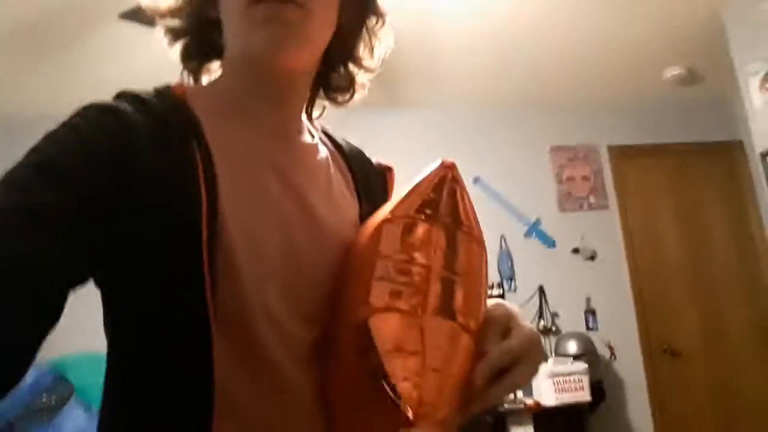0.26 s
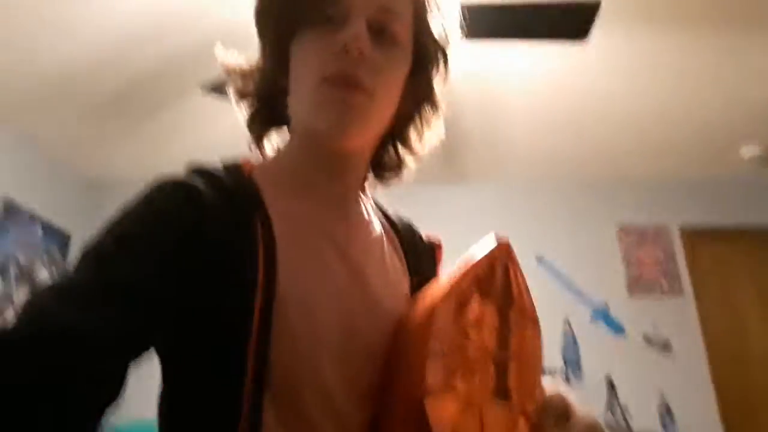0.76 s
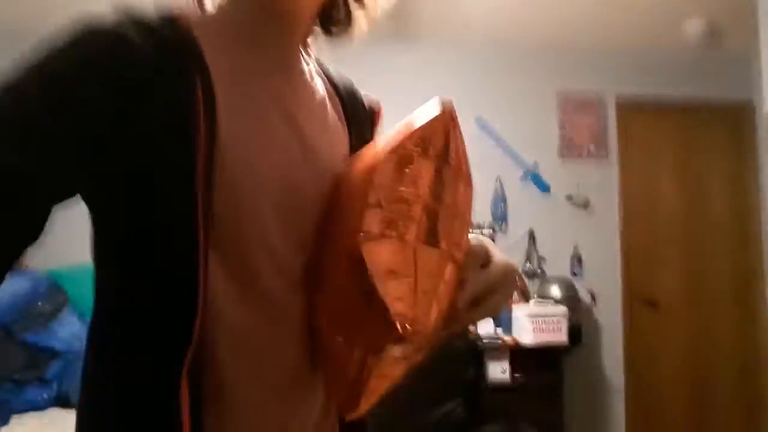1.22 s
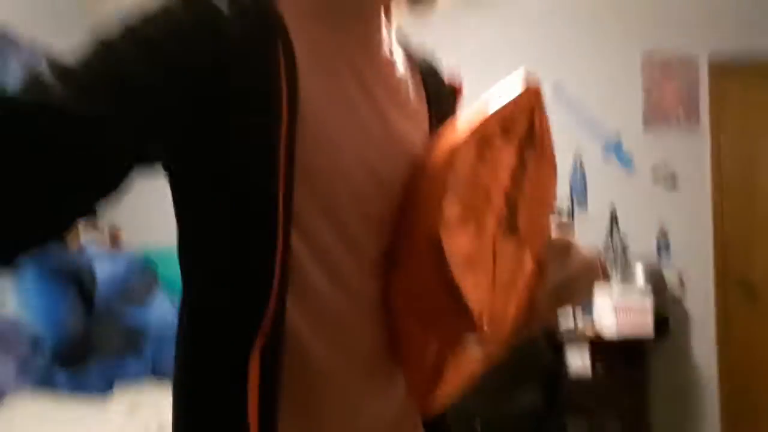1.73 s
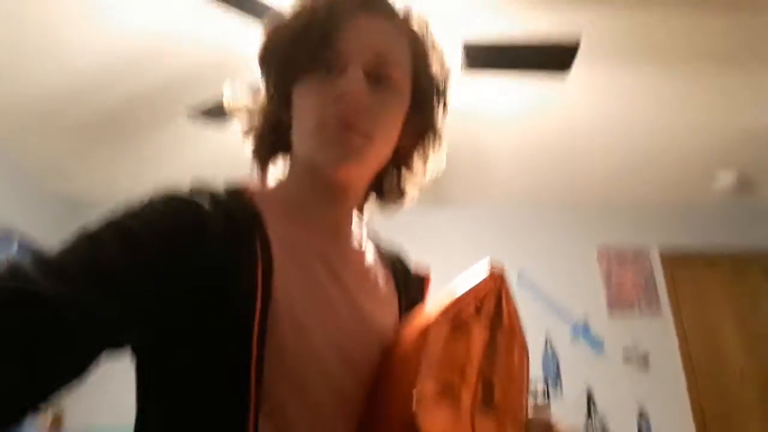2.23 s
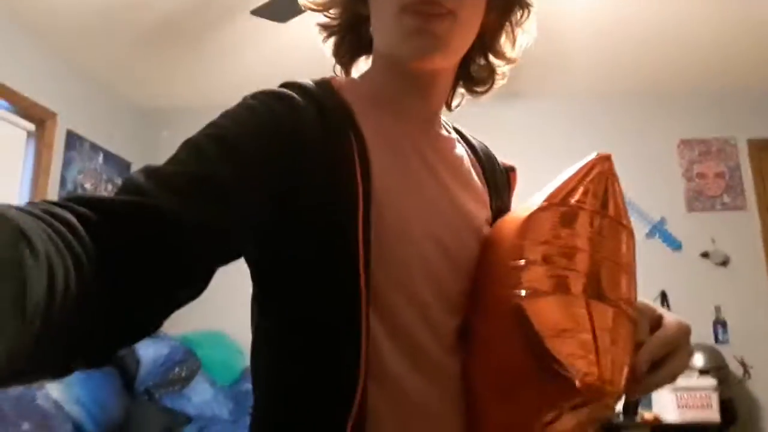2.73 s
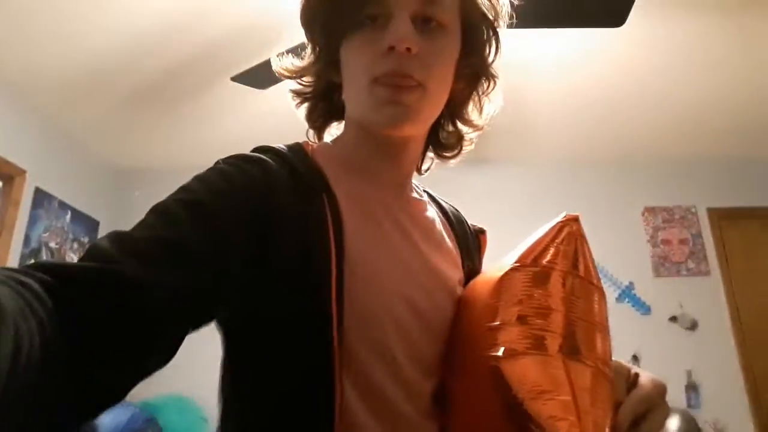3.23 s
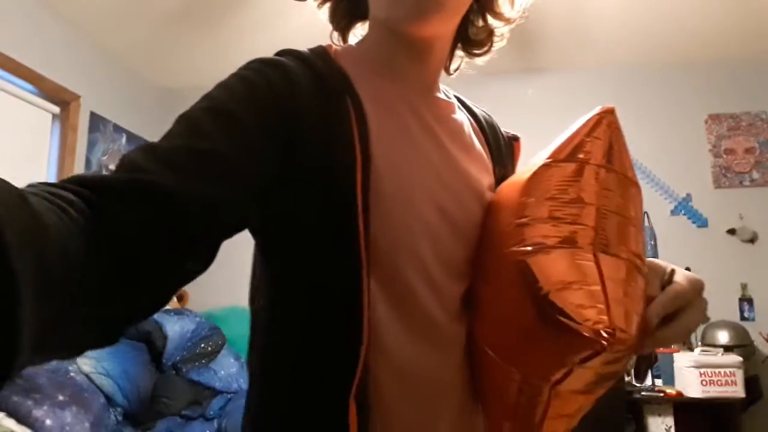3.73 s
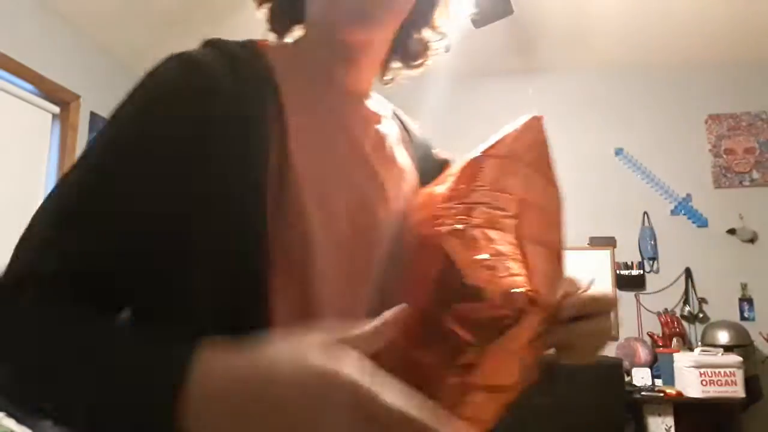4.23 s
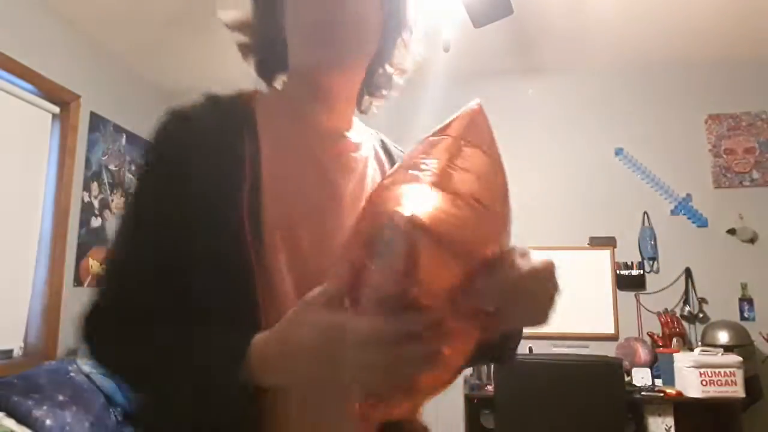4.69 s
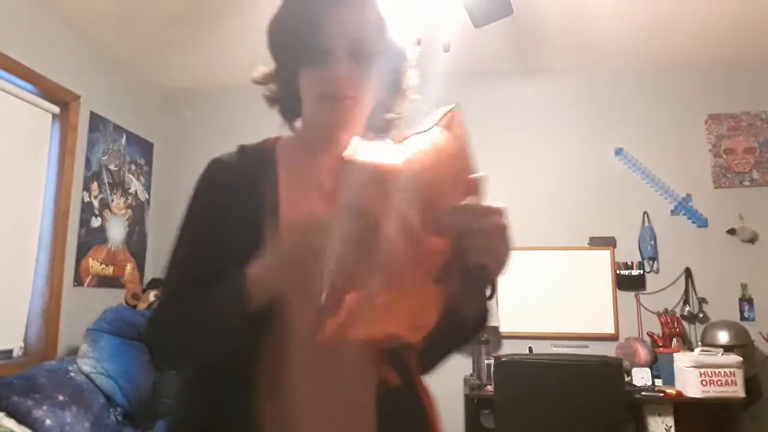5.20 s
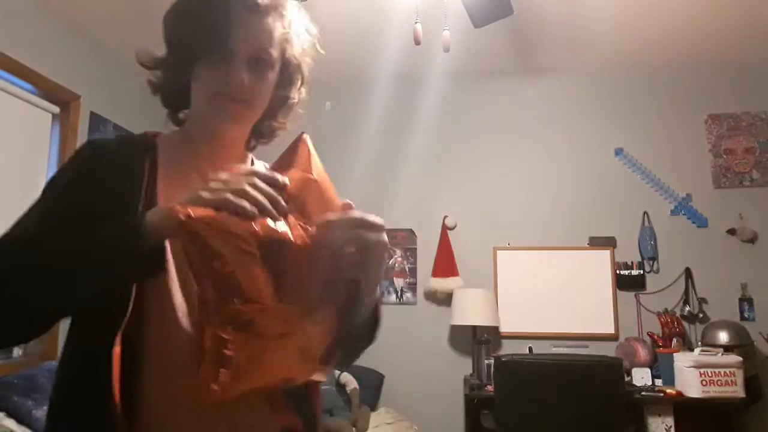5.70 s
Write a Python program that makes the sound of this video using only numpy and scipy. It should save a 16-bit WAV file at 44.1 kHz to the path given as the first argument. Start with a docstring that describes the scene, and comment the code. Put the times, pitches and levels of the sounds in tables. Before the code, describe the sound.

A small, quiet bedroom heard through a phone's close stereo microphones, with a very faint low murmur and hiss throughout. From 0 to 1.2 seconds fingers knock the casing: small taps, then hard, hollow thumps with short clatter around 0.3 and 0.4, more clicks near 0.7 and 0.95. Dull sleeve rubs and tiny sliding scrapes fill between. From 1.2 to 3 the handling is lighter: soft ticks, muffled rubs, a slightly stronger low swish around 2.5 to 2.7, taps near 2.85. From 3 to 3.9 it is nearly silent. At about 4 foil starts to stir, with isolated snaps at 4.25 to 4.35. From 4.5 the balloon is kneaded: dense, bright crackling swells, peaking with loud snaps between 4.8 and 5. Crinkling eases, snaps again around 5.25 to 5.35, dips near 5.45, then rustles anew from 5.55, with a sharp high crack at 5.9.

```python
"""Foil balloon in a bedroom

A person holds a foil balloon against the chest in a quiet bedroom and sets up a phone at arm's length.
Fingers knock and snap on casing and foil (short noise bursts), a sleeve rubs (noise in spurts), fingers
slide (gliding noise bands); then both hands knead the balloon, and its creases buckle in dense runs of
clicks that ring the gas-filled skin. Room air and hiss lie underneath as steady coloured noise."""
import sys
import numpy as np
from scipy import signal
from scipy.fft import rfft, irfft, next_fast_len
from scipy.io import wavfile
from scipy.ndimage import uniform_filter1d

SR = 44100
rng = np.random.default_rng(int(sys.argv[2]) if len(sys.argv) > 2 else 0)


def materialize(psi):
    """Save the field psi as 16-bit PCM at rate SR to the path in sys.argv[1].

    A 1-D psi becomes a single channel; in a 2-D psi each row is a channel.
    """
    bounded = np.clip(np.atleast_2d(psi).T, -1, 1)
    quanta = np.round(bounded * 32767).astype(np.int16)
    wavfile.write(sys.argv[1], SR, quanta)


N = 262395
T = np.arange(N) / SR


def amp(db):
    """Decibels to gain."""
    return 10 ** (np.asarray(db) / 20)


def unit(x):
    """Scale to rms 1."""
    return x / np.sqrt(np.mean(x ** 2) + 1e-20)


def db_at(points, hz):
    """Read (Hz, dB) points on a log-frequency axis."""
    point_hz, point_db = np.transpose(points)
    return np.interp(np.log(hz + 1), np.log(point_hz), point_db)


def convolve(x, response):
    """Pass a sound through a response, keeping its length."""
    return signal.fftconvolve(np.atleast_2d(x), np.atleast_2d(response), axes=-1)[:, :x.shape[-1]]


def colour(x, points, resonances=(), size=4096):
    """Causal filter with a smooth spectrum and resonances on top; keeps the power of white noise."""
    hz = np.arange(size // 2 + 1) * SR / size
    db = db_at(points, hz)
    for centre_hz, width_hz, lift_db in resonances:
        db = db + lift_db / (1 + (2 * (hz - centre_hz) / width_hz) ** 2)
    # folding the cepstrum gives minimum phase: the energy comes as early as it can
    cepstrum = irfft(np.log(amp(db)))
    cepstrum[1:size // 2] *= 2
    cepstrum[size // 2 + 1:] = 0
    response = irfft(np.exp(rfft(cepstrum)))
    return convolve(x, response / np.linalg.norm(response))


def ports(pair, side_points):
    """Two close microphones: the side-to-mid ratio by frequency sets how far they differ."""
    size = next_fast_len(pair.shape[1] + 4096)
    left, right = rfft(pair, size)
    ratio = amp(db_at(side_points, np.arange(len(left)) * SR / size))
    mid = left + right
    side = (left - right) * ratio
    both = np.array([mid + side, mid - side]) / np.sqrt(2 + 2 * ratio ** 2)
    return irfft(both, size)[:, :pair.shape[1]]


def pan(db):
    """Left and right gains of equal total power, from left minus right in dB."""
    gains = amp(np.array([db, -db]).reshape(2, -1) / 2)
    return gains / np.sqrt(np.mean(gains ** 2, axis=0))


def walk(rate):
    """Random wander with spread 1, passing `rate` random points a second."""
    knots = rng.standard_normal(8192)
    return unit(np.interp(T * rate, np.arange(len(knots)), knots))


def burst(decay_s, size=8192):
    """Scattered arrivals at both microphones, dying away; energy 1 in each on average."""
    x = rng.standard_normal((2, size)) * np.exp(-T[:size] / decay_s)
    return unit(x) / np.sqrt(size)


def add(out, s, x):
    """Mix a short sound in at time s."""
    i = max(int(s * SR), 0)
    out[:, i:i + x.shape[1]] += x[:, :max(N - i, 0)]


def strokes(timing, levels_db, size=40000):
    """Each movement builds up, holds and dies away; movements that overlap add in power."""
    power, t = np.full((1, N), 1e-14), T[:size]
    for (start_s, attack_s, hold_s, release_s), db in zip(timing, levels_db):
        rise = np.minimum(t / attack_s, 1)
        fall = np.exp(-np.maximum(t - attack_s - hold_s, 0) / release_s)
        add(power, start_s, (amp(db) * rise * fall)[None] ** 2)
    return np.sqrt(power[0])


def brighten(x, gain, edge_hz=4500):
    """Scale the treble by a gain."""
    high = signal.butter(2, edge_hz, "high", fs=SR, output="sos")
    return x + (gain - 1) * signal.sosfiltfilt(high, x)


# Squeezes of the balloon. Each row: start, attack, hold and release in seconds, level in dB before trim,
# treble in dB relative to that before trim, bulge of the whole skin in dB relative to that.
SQUEEZES = [(3.959, 0.17, 0.016, .06, -54.5, 2.5, -25), (4.142, 0.012, 0.22, 0.054, -53, -12, -8.5),
            (4.295, 0.013, 0.032, .03, -52.5, -3, -7), (4.391, 0.046, 0.099, 0.036, -51, -15, -12),
            (4.488, 0.082, 0.017, 0.02, -37.5, -3, -16), (4.59, 0.05, 0.018, 0.067, -36, 2.5, -18),
            (4.698, 0.035, 0.071, 0.025, -34, 4.5, -17.5), (4.792, 0.037, 0.12, 0.027, -30, 2.5, -18),
            (4.921, 0.02, 0.019, 0.016, -25.5, 2, -12), (5.0, 0.0089, 0.0033, 0.1, -28, 2, -22),
            (5.166, 0.023, 0.017, 0.064, -38, 9, -30), (5.207, 0.015, 0.13, 0.028, -33.5, -3, -14),
            (5.414, 0.052, 0.062, .03, -52, -1, -27), (5.547, 0.056, 0.01, 0.1, -29, 0.5, -19),
            (5.811, 0.078, 0.04, 0.021, -30, 1, -21)]
# Single creases that snap. Each row: start in seconds, peak in dB before trim and colour, ring in Hz,
# treble lift in dB, left minus right in dB.
SNAPS = [(4.026, -51, 1170, 8, 8), (4.247, -32, 1160, -20, 1), (4.32, -28, 1240, 5.5, 13),
         (4.342, -33.5, 1100, 4, 7), (4.518, -41, 1200, 10, 16), (4.666, -35.5, 1230, 18, -5),
         (4.761, -23.5, 1180, 4, -3), (4.832, -23.5, 1310, -1, 0.5), (4.8493, -19, 1520, -11, 0),
         (4.8717, -14.5, 1245, -5, 0), (4.904, -20.5, 1440, 2, -4), (4.9538, -12, 1260, 7, -2),
         (4.962, -20.5, 1060, -4, -1), (5.027, -24.5, 1210, 14, -19), (5.248, -16, 1060, 5, -4),
         (5.268, -22, 714, -14, 0), (5.294, -19.5, 1180, 4, 1), (5.321, -19, 1650, -30, -6),
         (5.337, -22.5, 1390, 9, -2), (5.405, -31, 1480, 8, -3), (5.481, -39, 1610, -3, -4),
         (5.565, -27, 1700, 5, 2), (5.671, -25.5, 1200, -6, -13), (5.765, -26, 1300, 8, -3),
         (5.899, -30, 1490, -9, -17), (5.916, -15.5, 2400, -2, 2)]
# Colour of the foil. Each row: frequency in Hz, level in dB.
FOIL_COLOUR = [(150, -47.5), (220, -7.5), (300, 1.5), (480, 6), (1000, -4), (1500, 1), (2000, 0),
               (3700, -4.5), (5200, -11.5), (7900, -8.5), (9300, -19), (12000, -13), (16000, -15.5)]
# Resonances of the inflated skin. Each row: frequency in Hz, width in Hz, lift in dB.
SKIN_RESONANCES = [(559, 93, -10.5), (677, 34, 9.5), (875, 84, 4.5), (1040, 250, -2.5), (1194, 570, 5.5),
                   (1587, 23, 6), (2280, 47, 4)]
# Colour of the whole balloon bulging. Each row: frequency in Hz, level in dB.
BULGE_COLOUR = [(40, -14.5), (70, -9.5), (94, -1), (112, -2), (133, 2), (160, 1), (205, -9.5), (300, -43.5)]
# Stereo spread of the foil. Each row: frequency in Hz, side against mid in dB.
FOIL_SIDE = [(100, -17), (380, -10), (700, 0), (1290, 1.5), (2400, 2), (4400, 0)]


def crinkle(level_db=-3, treble_trim_db=1, snap_trim_db=3.5, avalanche_s=0.0078, avalanche_db=-13,
            walls_db=-7, walls_s=0.046, bulge_lag_s=0.018):
    """Squeezes drive the buckling creases; a few snap loudly and set off others; skin and walls colour all."""
    *timing, squeeze_db, treble_db, bulge_db = np.transpose(SQUEEZES)
    timing = np.transpose(timing)
    clicks, effort = buckles(), strokes(timing, squeeze_db)
    # a snap sets off its neighbours: a decaying flurry, level against the snap's peak before trim
    flurry_timing = [(s, 1 / SR, 0, avalanche_s) for s, *_ in SNAPS]
    avalanches = strokes(flurry_timing, np.array(SNAPS)[:, 1] + avalanche_db)
    foil = clicks * np.hypot(effort * amp(level_db), avalanches)
    # tight creases are brighter than slack ones
    foil = brighten(foil, strokes(timing, squeeze_db + treble_db + treble_trim_db) / effort)
    for s, peak_db, hz, bright_db, pan_db in SNAPS:
        snap = facet(hz, direct=0.5, flutter_s=0.0017, ring=0.53)
        snap = brighten(snap / np.abs(snap).max(), amp(bright_db))
        add(foil, s, amp(peak_db + snap_trim_db) * pan(pan_db) * snap)
    # walls answer after the direct sound
    walls = burst(walls_s) * (T[:8192] > .003)
    foil = foil + amp(walls_db) * convolve(foil, walls)
    foil = colour(ports(foil, FOIL_SIDE), FOIL_COLOUR, SKIN_RESONANCES)
    # the same buckles shake the whole gas-filled skin; the gas gives way just after the creases
    shake = np.interp(T - bulge_lag_s, T, strokes(timing, squeeze_db + bulge_db))
    bulge = colour(ports(clicks * shake, FOIL_SIDE), BULGE_COLOUR)
    return (foil + bulge) * pan(1.0)


def buckles(rate=1700, spread_db=3.0, run_db=2.5, run_rate=110, patchy_db=2.5, low_hz=500, high_hz=4200,
            count=20):
    """Clicks of unequal size come in runs; pressure wanders between facets, so their colour keeps changing."""
    runs, clicks = amp(run_db * walk(run_rate)), 0
    for hz in np.geomspace(low_hz, high_hz, count):
        when, size, sign, chance = rng.random((2048, 4)).T
        at = (when * N).astype(int)
        # thin the candidates so all facets together give about `rate` clicks a second
        kept = chance < rate * T[-1] / count / len(at)
        sizes = amp(-spread_db * np.log(np.maximum(size, .03))) * np.sign(sign - .5) * kept
        pressed = runs[at] * amp(patchy_db * walk(22)[at])
        impulses = np.bincount(at, sizes * pressed, N)
        clicks = clicks + convolve(impulses, facet(hz, direct=0.48, flutter_s=0.0021, ring=0.51))
    # level the energy over a few hundredths of a second, so the hands decide how much is released
    energy = uniform_filter1d(np.mean(clicks ** 2, axis=0), size=1500)
    return clicks / np.sqrt(energy + 1e-9)


def facet(hz, direct, flutter_s, ring, cycles=3.8, lag_s=0.0001, size=1024):
    """One patch of foil flips: a sharp pulse and a short flutter, then a few cycles of its own pitch."""
    t, lag = T[:size], int(rng.uniform(0, lag_s) * SR)
    response = burst(flutter_s, size=size)
    tone = np.sin(2 * np.pi * hz * t) * np.exp(-t * hz / cycles)
    flip = ring * unit(tone) / np.sqrt(size)
    flip[0] += direct
    # one microphone hears it first
    response -= [np.roll(flip, k) for k in rng.permutation([0, lag])]
    return unit(response) / np.sqrt(size)


# Handling knocks. Each row: start in seconds, then thump, knock, crack and tick (low to high bands) in dB
# before the casing's colour, left minus right in dB, decay in seconds.
KNOCKS = [(0.022, -45, -35, -38, -52, 2, 0.0024), (0.069, -53, -53, -42, -72, -1, 0.0077),
          (0.14, -71, -39, -42.5, -46, 3, 0.024), (0.182, -37.5, -28.5, -38.5, -73, 0.5, 0.015),
          (0.2926, -20, -20, -29, -25, 3.5, 0.02), (0.319, -36, -28, -28, -34, 1, 0.023),
          (0.412, -21, -13.5, -25.5, -34.5, 1, 0.024), (0.426, -23, -27, -25, -46, -3, 0.0068),
          (0.691, -44, -35, -36, -27.5, 7, 0.006), (0.701, -31, -27, -27.5, -40, -1.5, 0.029),
          (0.9203, -61, -35, -34.5, -26.5, 4, 0.0074), (0.9253, -34.5, -34, -25, -33, -5, 0.0082),
          (0.945, -38.5, -30, -48, -73, 3, 0.0063), (0.982, -40.5, -43, -42.5, -50.5, 0, 0.005),
          (1.09, -35.5, -34.5, -34.5, -41.5, 2, 0.012), (1.1973, -39, -39.5, -50.5, -54.5, 3, 0.011),
          (1.3351, -46, -53.5, -50.5, -62, 2, 0.017), (1.4708, -48.5, -56, -66, -60, -3, 0.0021),
          (1.4917, -75, -53.5, -50, -54, -2, 0.001), (1.501, -57, -46, -51, -54, 10, 0.0013),
          (1.542, -57, -51.5, -38, -38, 2, 0.0015), (1.6406, -41.5, -38, -40, -44, 5.5, 0.0043),
          (1.7515, -33, -32.5, -55, -62.5, 3.5, 0.004), (1.76, -42, -35.5, -50.5, -44.5, -6, 0.015),
          (1.7886, -58, -50.5, -60, -78, -12, 0.11), (1.849, -72, -53, -60, -66.5, 2, 0.025),
          (2.063, -65, -58, -59.5, -78, 6.5, 0.013), (2.2515, -51.5, -61, -72.5, -75.5, 2.5, 0.01),
          (2.7074, -46.5, -40.5, -45, -55, -9, 0.02), (2.81, -72, -70, -61, -52, -15, 0.0077),
          (2.8503, -43, -36, -40.5, -41, -2, 0.0066), (2.854, -48, -37.5, -37, -39.5, -13, 0.0091),
          (2.899, -70, -63, -67, -69, 10, 0.003), (3.5694, -53.5, -62, -60, -60, -9, 0.023),
          (4.182, -56, -44.5, -50.5, -68, 2, 0.018)]
# Edges of those four bands, in Hz.
KNOCK_EDGES_HZ = [60, 250, 800, 2500, 9000]
# Colour of the casing, shared by all knocks. Each row: frequency in Hz, level in dB.
CASING = [(35, -17.5), (70, -5), (130, 3.5), (240, -5), (370, 2), (520, -1.5), (800, 4.5), (1600, 4),
          (2500, 2.5), (3800, 1), (5200, -4), (7800, -1.5), (9300, -14), (12000, -10), (16000, -12.5)]
# Hollow boom that lingers after a knock. Each row: frequency in Hz, level in dB.
HOLLOW_BOOM = [(70, -20.5), (120, -6.5), (152, -6), (185, 9.5), (225, -6.5), (300, -23), (380, -6.5),
               (470, -7.5), (700, -3), (1300, -24), (3000, -51)]
# Stereo spread close to the microphones. Each row: frequency in Hz, side against mid in dB.
NEAR_SIDE = [(60, -25.5), (200, -6), (450, -8), (1200, 1), (4000, -1.5)]


def knocks(front=0.95, front_s=0.0013, push=0.59, push_hz=1200, uneven_db=2.0, tail_db=-17, tail_s=0.027,
           dull_db=-5, boom_db=-8, boom_s=0.054, size=12000, count=660):
    """Each knock is one push with a brief crackle, then an uneven, duller clatter; a hollow boom lingers."""
    out, t = np.zeros((2, N)), T[:size]
    edges = np.array(KNOCK_EDGES_HZ)
    centres, widths = np.sqrt(edges[1:] * edges[:-1]), np.diff(edges)
    # a soft fingertip pushes for about a millisecond
    soft = signal.butter(2, push_hz, fs=SR, output="sos")
    shove = signal.sosfilt(soft, signal.unit_impulse(size))
    for s, *band_db, pan_db, decay_s in KNOCKS:
        rattle = amp(uneven_db * np.interp(t, t[::100], rng.standard_normal(len(t[::100]))))
        tail = amp(tail_db) * np.sqrt(tail_s / decay_s) * burst(tail_s, size=size)
        clatter = burst(decay_s, size=size) * unit(rattle) + tail
        clatter = colour(clatter, [(1800, 0.014), (6000, dull_db)], size=256)
        crackle = colour(burst(front_s, size=size), [(500, -13.5), (2500, -9.5)], size=256)
        strength = np.linalg.norm(amp(band_db))
        # hard knocks put more into their first instant
        sharp = (strength / .04) ** .35
        blow = ports(clatter + sharp * front * crackle, NEAR_SIDE) - sharp * push * shove
        # band levels become levels per Hz
        spectrum = np.transpose([centres, band_db - 10 * np.log10(widths)])
        blow = colour(colour(blow, spectrum, size=1024), CASING, size=1024)
        # the strength is the rms of the first `count` samples
        blow = blow / np.sqrt(np.mean(blow[:, :count] ** 2))
        add(out, s, pan(pan_db) * strength * blow)
    boom = ports(colour(burst(boom_s, size=size), HOLLOW_BOOM), NEAR_SIDE)
    return out + amp(boom_db) * convolve(out, boom / np.abs(rfft(boom)).max())


# Rubs of fingers and sleeve on the phone. Each row: start, attack, hold and release in seconds,
# level of the dull part in dB, level of the hiss in dB, both before the low modes ring.
RUBS = [(0.0, 0.0033, 0.055, .07, -47.5, -51.5), (0.15, 0.035, 0.11, 0.029, -53, -50),
        (0.288, 0.033, 0.021, 0.05, -30.5, -46), (0.416, .02, 0.017, 0.071, -37, -63),
        (0.569, 0.14, .03, 0.012, -37.5, -43.5), (0.667, 0.019, 0.023, 0.056, -34, -43.5),
        (0.816, 0.019, 0.15, 0.037, -59, -60.5), (1.04, 0.068, 0.013, 0.015, -36.5, -62.5),
        (1.155, 0.025, 0.041, 0.042, -52, -59), (1.294, 0.095, 0.044, 0.02, -52, -59),
        (1.495, .02, .07, 0.042, -60.5, -61), (1.638, 0.016, 0.091, 0.055, -48, -50.5),
        (1.87, 0.033, 0.15, .06, -59.5, -77), (2.108, 0.046, 0.0089, 0.032, -47.5, -61.5),
        (2.331, 0.086, 0.12, 0.035, -48.5, -53.5), (2.447, 0.13, 0.022, 0.17, -40.5, -49.5),
        (2.661, 0.052, 0.028, 0.044, -37.5, -47), (2.808, 0.022, 0.17, 0.065, -49, -57.5),
        (3.063, .03, 0.026, 0.035, -52, -64), (3.313, 0.046, 0.069, 0.11, -51, -62),
        (3.558, 0.016, .02, 0.017, -58.5, -59.5), (3.74, .03, .02, .025, -73.5, -76.5)]
# Colour of the dull part. Each row: frequency in Hz, level in dB.
RUB_COLOUR = [(25, -42.5), (50, -19.5), (80, -10.5), (130, -6.5), (200, -1), (270, 1.5), (370, -6),
              (470, -5.5), (650, -3.5), (850, -11.5), (1300, -15), (2500, -49), (5000, -55)]
# Colour of the hiss. Each row: frequency in Hz, level in dB.
HISS_COLOUR = [(200, -31.5), (500, -17), (900, 6), (1500, 9.5), (2500, 3.5), (3600, 2.5), (5200, -5),
               (7800, -3.5), (9300, -16), (12000, -10), (16000, -13.5)]
# Stereo spread of the dull part. Each row: frequency in Hz, side against mid in dB.
RUB_SIDE = [(60, -7.5), (200, -0.5), (500, -5.5), (1300, 0.5), (4000, -5.5)]


def rubbing(rough_db=1.56, grit_db=0.5, pan_db=1.0):
    """Cloth and skin catch and slip: fibre noise in uneven spurts, dull through the casing and as hiss."""
    *timing, level_db, hiss_db = np.transpose(RUBS)
    timing = np.transpose(timing)
    spurts = unit(amp(rough_db * walk(140) + grit_db * walk(1200)))
    fibres = rng.standard_normal((2, N)) * spurts
    dull = unit(colour(ports(fibres, RUB_SIDE), RUB_COLOUR)) * strokes(timing, level_db)
    # swapped channels for the hiss
    hiss = unit(colour(fibres[::-1], HISS_COLOUR)) * strokes(timing, hiss_db)
    return (dull + hiss) * pan(pan_db)


# Low modes that ring on after knocks and rubs, hollow like the gas-filled balloon.
# Each row: frequency in Hz, width in Hz, level in dB.
CAVITY = [(157.3, 10, 2), (185, 7.9, 2.5), (242, 14, -15.5), (451, 24, 2.5)]


def hollow(x):
    """Handling sets the low modes ringing: narrow resonators added to the direct sound."""
    ringing = 0
    for hz, width_hz, db in CAVITY:
        b, a = signal.iirpeak(hz, hz / width_hz, fs=SR)
        ringing = ringing + amp(db) * signal.lfilter(b, a, x)
    return x + ringing


# Scrapes, swishes and groans of sliding fingers. Each row: start in seconds, length in seconds,
# first and last frequency in Hz, width in Hz, level at the height of the swell in dB.
SLIDES = [(0.621, .045, 415, 393, 414, -40), (.655, 0.056, 467, 717, 940, -45),
          (1.062, 0.046, 505, 530, 352, -37), (1.048, 0.066, 1810, 2660, 5200, -47),
          (1.17, 0.046, 447, 450, 400, -66), (1.382, 0.025, 610, 540, 500, -46),
          (1.515, 0.067, 2240, 2190, 900, -50), (1.763, 0.068, 1146, 1090, 350, -41.5),
          (1.823, 0.072, 1135, 1110, 400, -47.5), (2.558, 0.066, 290, 294, 137, -33),
          (2.819, 0.035, 930, 1320, 1400, -42.5), (3.095, 0.07, 321, 174, 79.4, -46),
          (3.301, 0.096, 245.5, 291, 278, -49.5), (3.568, 0.1, 2100, 1913, 882, -63),
          (3.737, .09, 940, 908, 700, -62.5), (3.92, 0.13, 850, 1092, 591, -61.5),
          (4.042, 0.17, 1200, 943, 700, -49.5), (4.094, .13, 717, 490, 200, -62),
          (4.385, 0.077, 313, 293, 40, -46.5)]


def slides():
    """A sliding finger stirs one stretch of foil or casing, whose resonance moves as the pressure changes."""
    out = np.zeros((2, N))
    for s, length_s, first_hz, last_hz, width_hz, db in SLIDES:
        n = int(length_s * SR)
        phase = 2 * np.pi * np.cumsum(np.geomspace(first_hz, last_hz, n)) / SR
        narrow = signal.butter(2, width_hz / 2, fs=SR, output="sos")
        # keep only the end of the noise, once the filter has settled
        stir = signal.sosfilt(narrow, rng.standard_normal((2, 2, SR // 2)))[..., -n:]
        tone = ports(stir[0] * np.cos(phase) + stir[1] * np.sin(phase), NEAR_SIDE)
        swell = np.hanning(n)
        add(out, s, amp(db) * unit(tone * swell) * np.sqrt(np.mean(swell ** 2)))
    return out


# Colour of the still room. Each row: frequency in Hz, level in dB.
ROOM_COLOUR = [(15, -50.5), (25, -23.5), (48, -25.5), (117, 9), (242, -32.5), (439, -17.5), (516, -35.5),
               (863, -15.5), (1290, -22), (1740, -26), (3160, -34), (14800, -33.5), (16000, -40.5)]


def room(level_db=-63.5, wander_db=0.85):
    """Low murmur of the room's air and faint microphone hiss: coloured noise that wanders slightly in level."""
    air = colour(ports(rng.standard_normal((2, N)), NEAR_SIDE), ROOM_COLOUR)
    return unit(air) * amp(level_db + wander_db * walk(12))


def scene():
    """The kneaded balloon, fingers and sleeve on the phone, over the still room."""
    return crinkle() + hollow(knocks() + rubbing()) + slides() + room()


def record(dry, low_hz=48, top_hz=15800):
    """The phone drops the deepest rumble, clips at full scale and cuts the top."""
    rumble_cut = signal.butter(4, low_hz, "high", fs=SR, output="sos")
    top_cut = signal.ellip(10, .2, 100, top_hz, fs=SR, output="sos")
    sound = np.clip(signal.sosfilt(rumble_cut, dry), -1, 1)
    return signal.sosfilt(top_cut, sound)


dry = scene()
out = record(dry)
materialize(out)
```